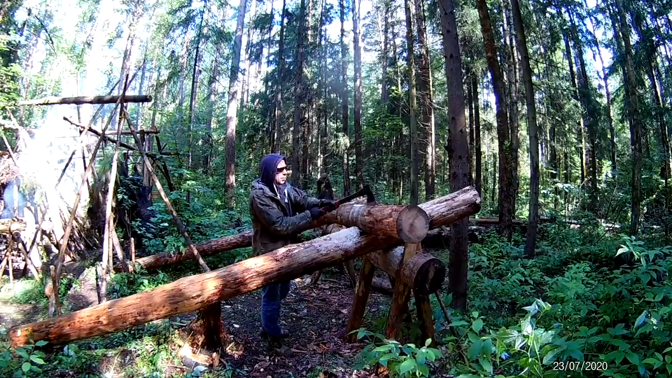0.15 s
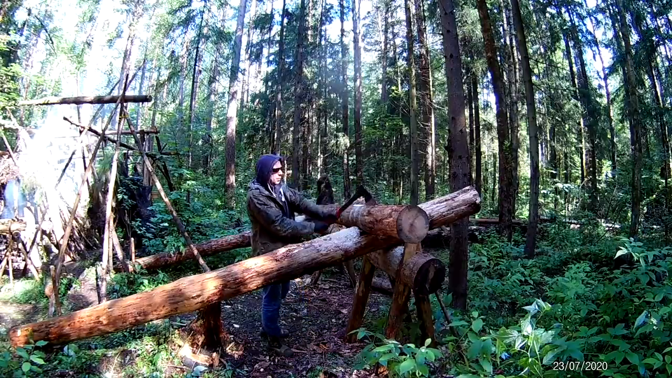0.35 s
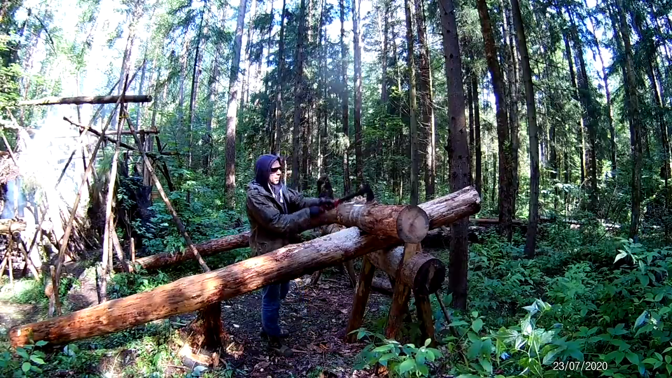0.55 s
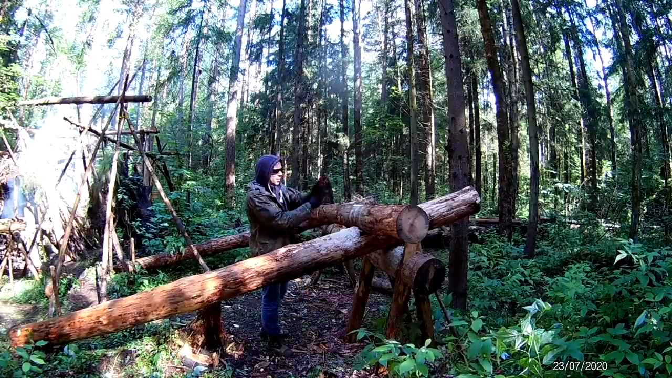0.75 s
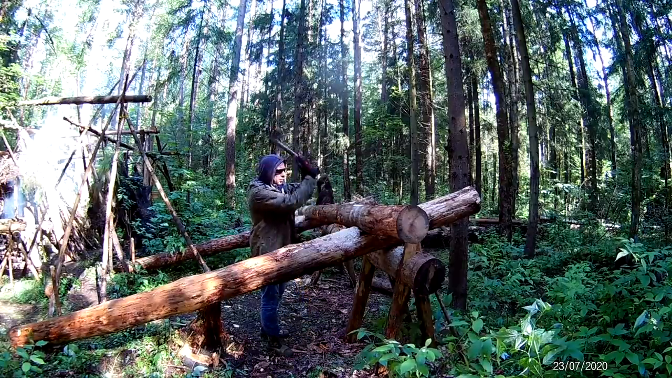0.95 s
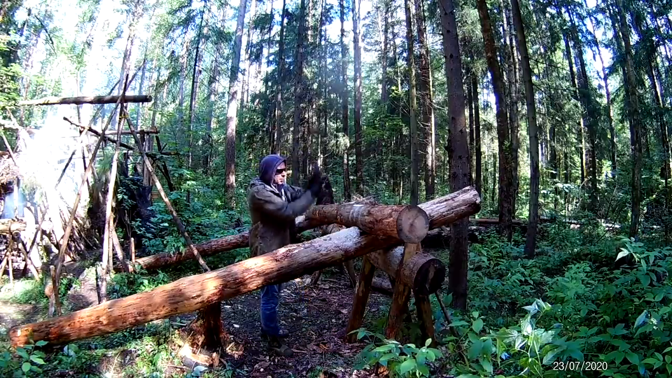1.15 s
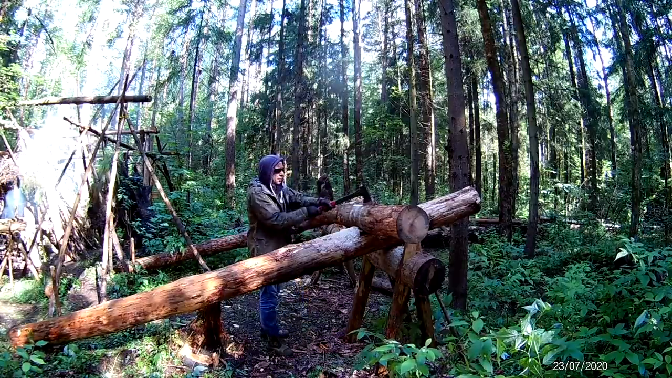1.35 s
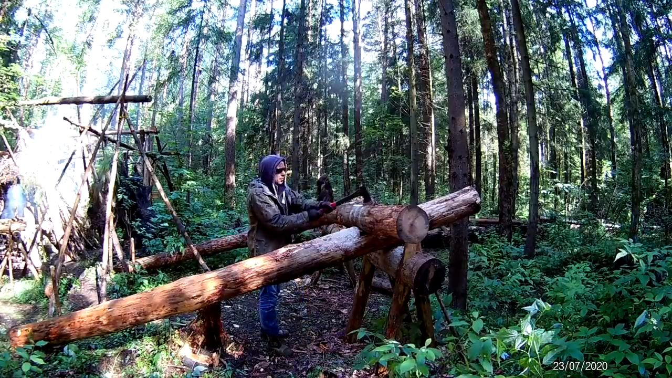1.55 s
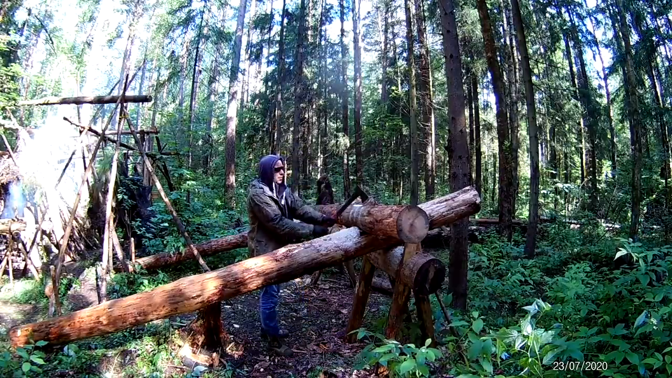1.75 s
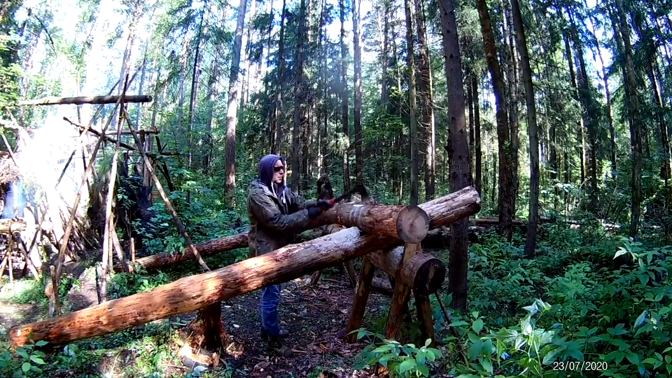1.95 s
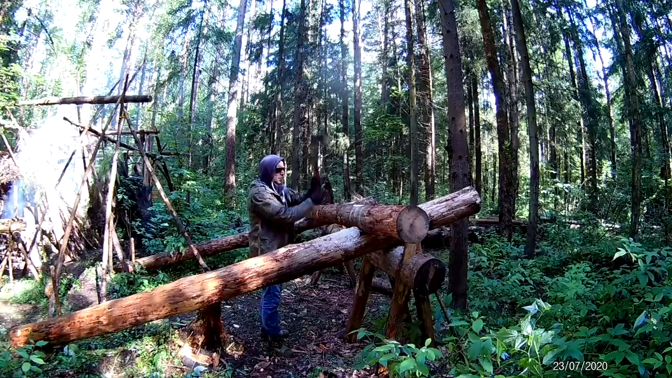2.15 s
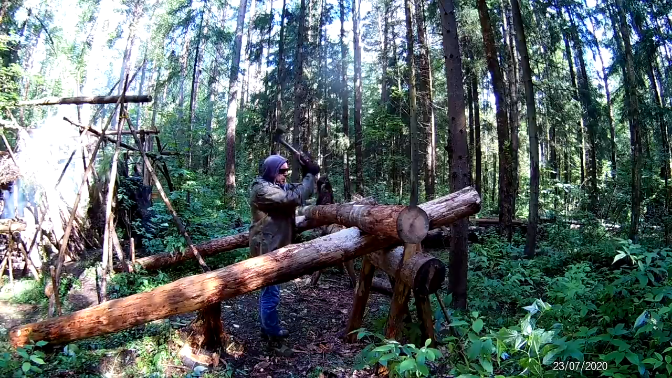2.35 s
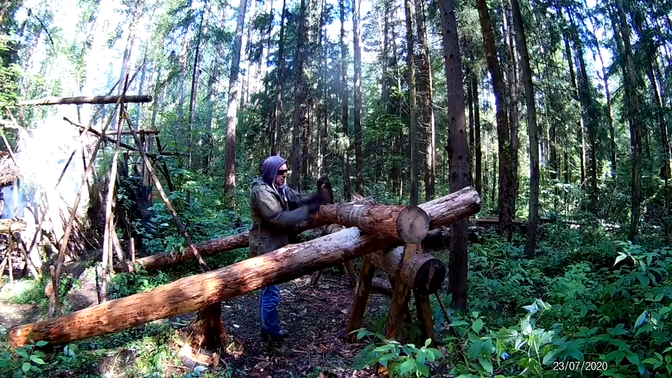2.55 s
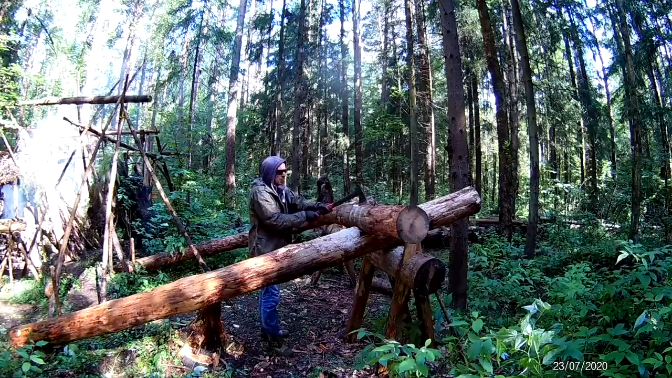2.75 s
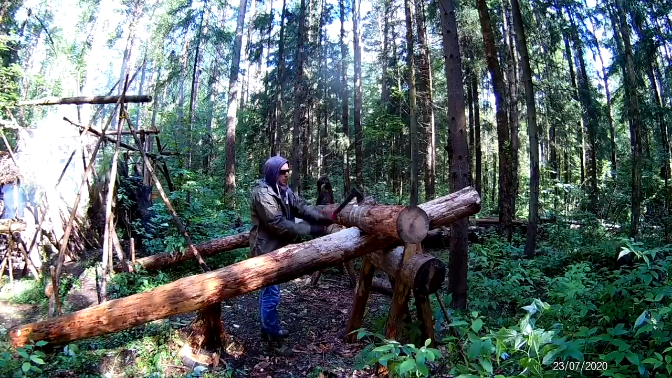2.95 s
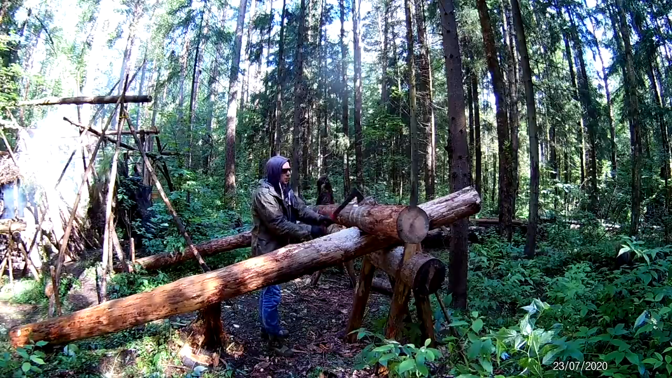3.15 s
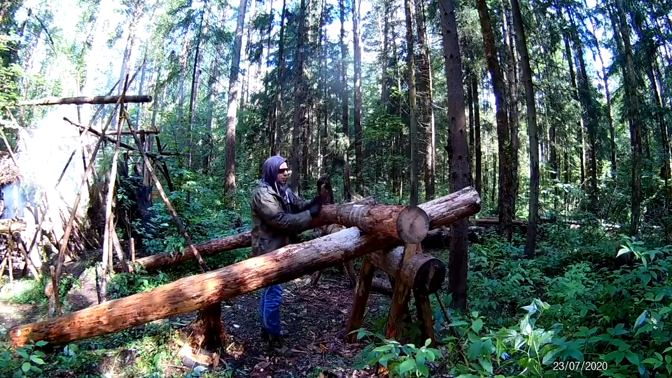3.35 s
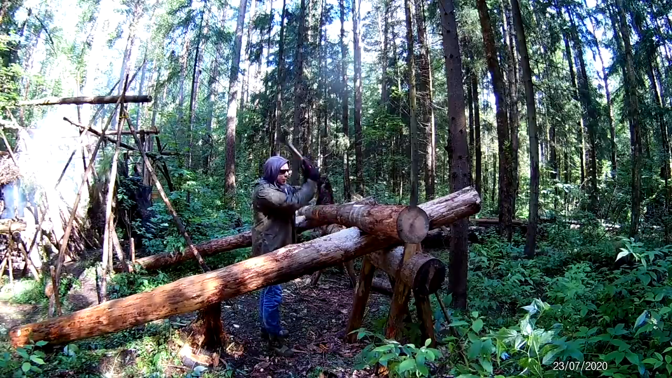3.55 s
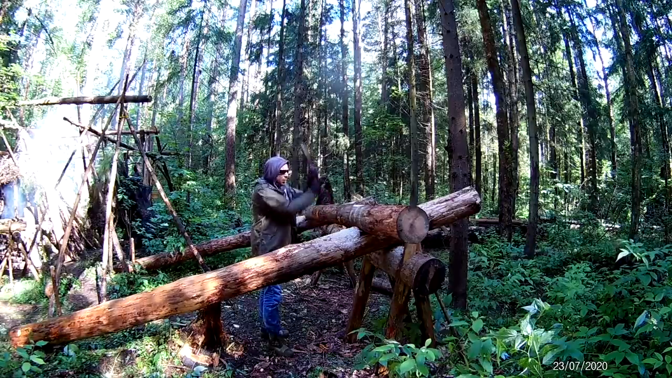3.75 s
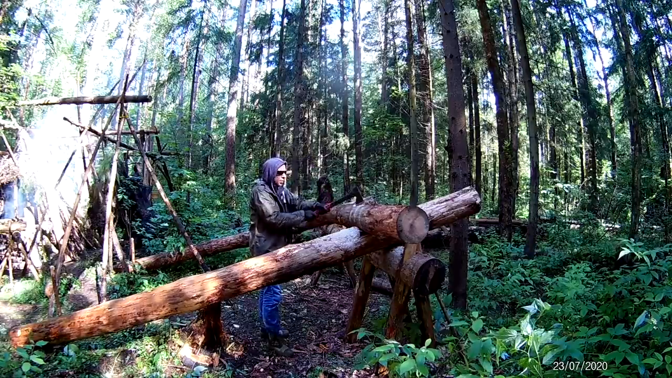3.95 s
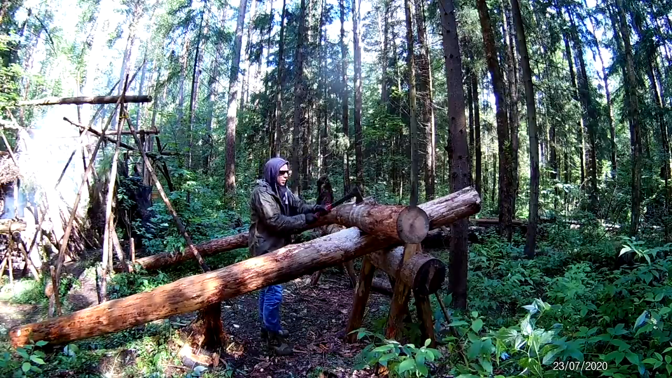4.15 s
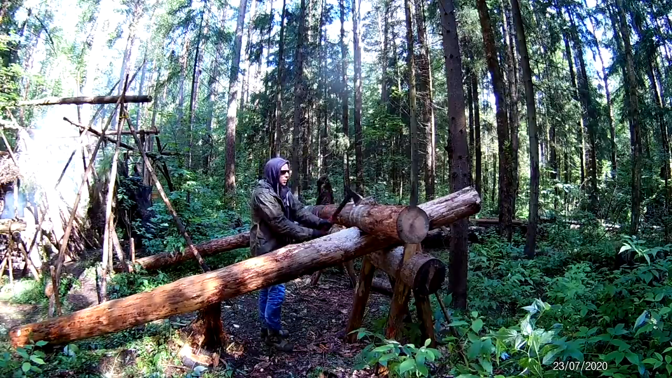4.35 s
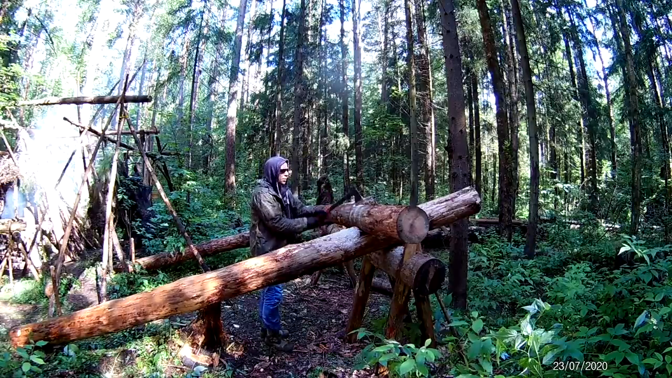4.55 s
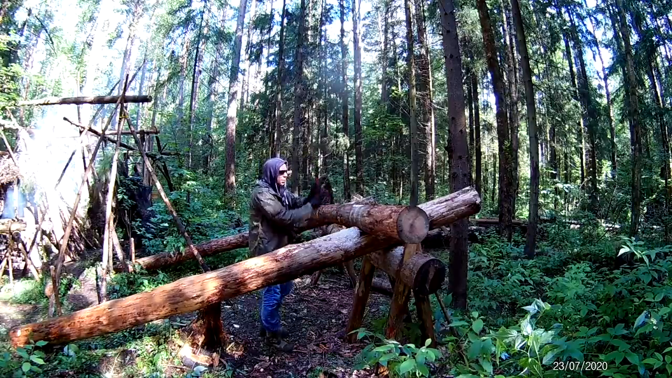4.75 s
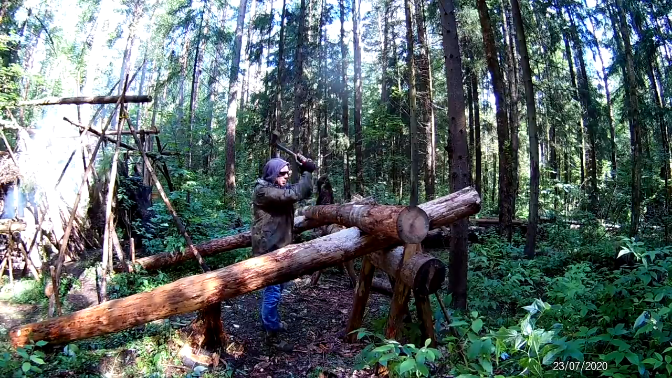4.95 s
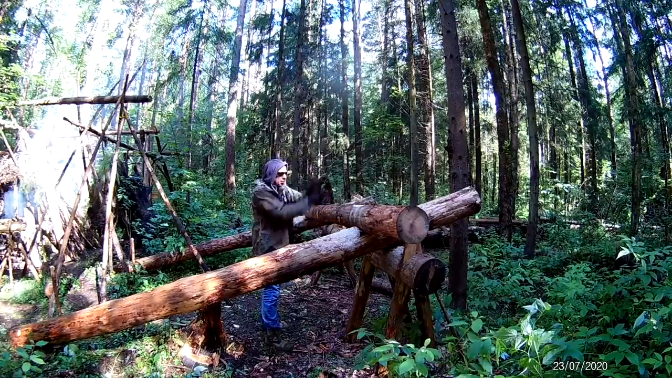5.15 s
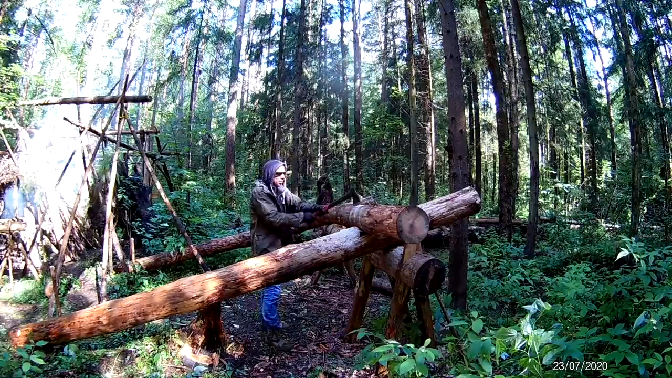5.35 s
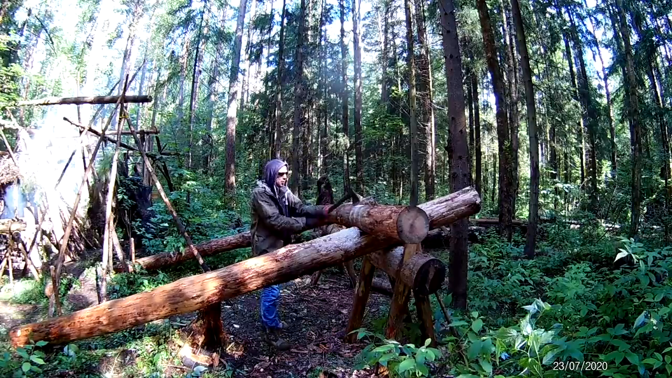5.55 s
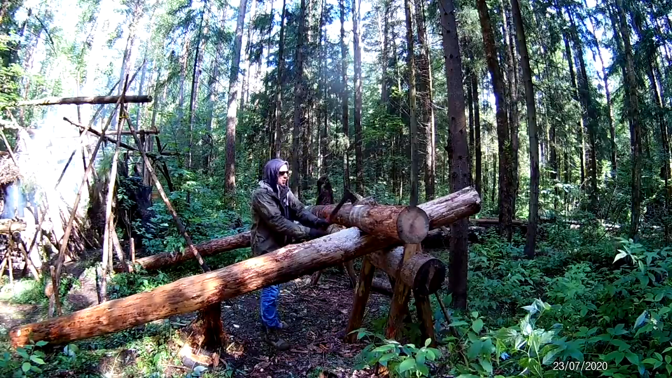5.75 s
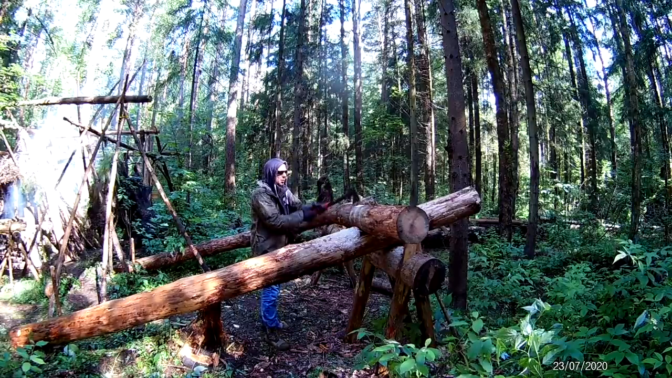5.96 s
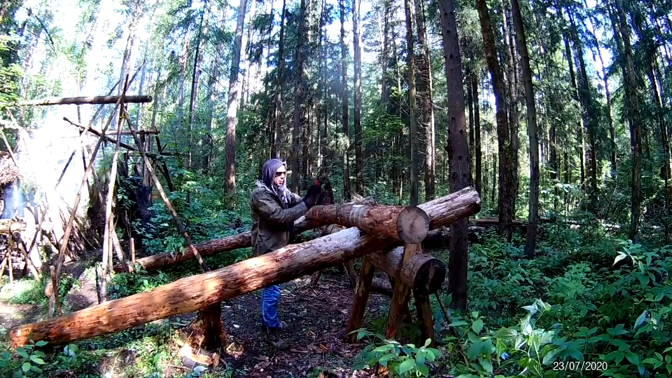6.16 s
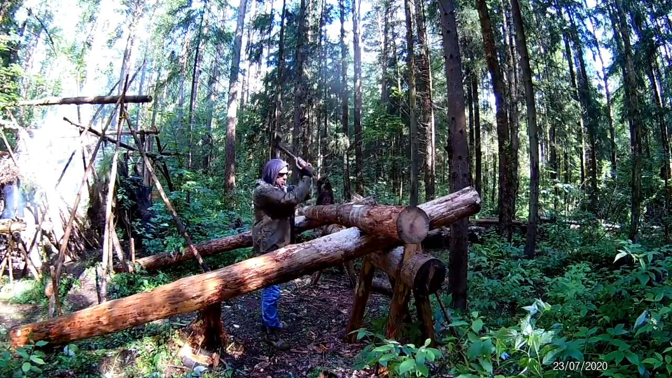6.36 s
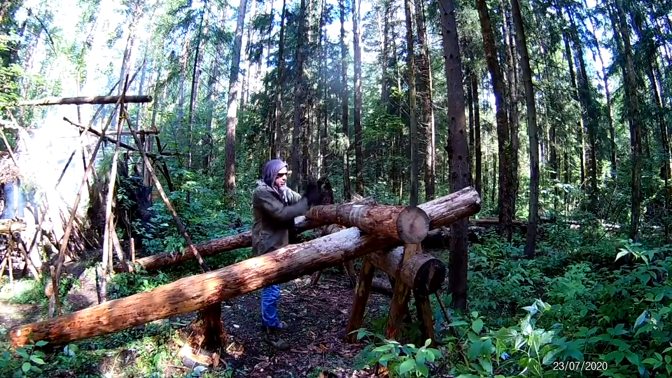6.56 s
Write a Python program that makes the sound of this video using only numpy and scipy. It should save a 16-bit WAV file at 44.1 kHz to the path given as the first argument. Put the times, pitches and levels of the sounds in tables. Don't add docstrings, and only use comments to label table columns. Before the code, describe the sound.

An axe chops a propped log with five sharp, woody knocks about 1.3 seconds apart in a still forest, while a small bird chips.

```python
import sys
import numpy as np
from scipy import signal
from scipy.io import wavfile
from scipy.ndimage import uniform_filter1d

SR = 44100
rng = np.random.default_rng(int(sys.argv[2]) if len(sys.argv) > 2 else 0)


def voltage_ratio(level):
    return 10 ** (np.asarray(level, float) / 20)


def persist_wave(psi):
    counts = np.round(np.clip(psi, -1, 1) * 32767).astype(np.int16)
    wavfile.write(sys.argv[1], SR, np.atleast_2d(counts).T)


N = 291501
LEAD = SR // 10
M = N + LEAD


def band(x, hz, width_hz, order=2):
    half = min(width_hz / hz / 2, .9)
    edges = [hz * (1 - half), hz * (1 + half)]
    return signal.sosfilt(signal.butter(order, edges, "band", fs=SR, output="sos"), x)


def unit(x):
    return x / np.sqrt(np.mean(x ** 2))


def fade(t, t60):
    return np.exp(-np.log(1000) * t / t60)


def add(out, s, x):
    i = int(round(s * SR)) + LEAD
    out[i:i + len(x)] += x[:len(out) - i]


def walk(rate):
    hold = int(SR / rate)
    levels = np.repeat(rng.standard_normal(M // hold + 1), hold)
    return 0.81 * uniform_filter1d(uniform_filter1d(levels, hold), hold)[:M]


# direction of the push (sign and size), length of the push in ms,
# pitch as a multiple of the knock pitch, time to fade by 60 dB in seconds, level in dB.
BLOW_STAGES = [
    (0.46, 0.56, 2.2, 0.03, -16.5),
    (-0.88, 1.04, 1.002, 0.018, -2),
    (1, 1.264, 1.596, 0.0097, -9.5),
    (-0.77, 1, 0.49, 0.019, -10),
    (-0.9, 1.23, 0.6666, 0.072, -11.5),
]
STAGE_DELAYS_MS = (0, 4.1, 12.2, 13.1, 13.5)


def knock(knocks, t, s, knock_hz, blow_db, split_db):
    tick_db = -2 + 0.58 * split_db
    knock_db = 2.5 + 0.11 * blow_db
    thump_db = 7 + blow_db
    stage_db = (tick_db, knock_db, thump_db, thump_db, thump_db)
    for ms, (sign, push_ms, ratio, t60, db), more_db in zip(STAGE_DELAYS_MS, BLOW_STAGES, stage_db):
        push = np.hanning(int(push_ms * SR / 1000) + 3)
        tone = np.sin(2 * np.pi * ratio * knock_hz * t) * fade(t, t60)
        body = sign * voltage_ratio(db + more_db) * tone
        add(knocks, s + ms / 1000, signal.fftconvolve(body, push / push.sum()))


# pitch in Hz, time
# to fade by 60 dB in seconds.
LOG_MODES = [(53, .4), (118.5, 0.4), (197.5, 0.28), (224, 0.034), (303, 0.073), (312.5, 0.53), (426, 0.29),
             (446, 0.5), (532, 0.19), (647, 0.2), (681, 0.08), (791, 0.47), (830, 0.15), (948, 0.37),
             (1010, .13), (1137, .29), (1231, 0.17), (1610, 0.077), (1619, 0.17), (1735, 0.092),
             (1821, 0.13), (1917, 0.092), (2291, 0.32)]
# level in dB where it swings most,
# place of the nearest still point (node) in metres.
MODE_SHAPES = [(-40.5, 1.2), (-23, -0.75), (-19.5, -0.59), (-8.5, -0.106), (-6, 0.19), (-20.5, -0.48),
               (-22.0, 0.314), (-18.5, -0.32), (-21, -0.39), (-20.5, -0.043), (-11, 0.33), (-38.5, -0.05),
               (-22, -0.282), (-38.5, 0.317), (-27, 0.227), (-33.5, -0.181), (-39.5, 0.243), (-25.5, 0.11),
               (-33.9, -0.24), (-34, -0.207), (-40, -0.208), (-44, 0.094), (-61, 0.21)]


def log_ring(t, blow_db, spot_m):
    wavers = [np.interp(t, np.linspace(0, .6, 24), row) for row in rng.standard_normal((len(LOG_MODES), 24))]
    ring = np.zeros(len(t))
    for k, ((db, node_m), (hz, t60)) in enumerate(zip(MODE_SHAPES, LOG_MODES)):
        bend_rad_m = 1.6 * np.sqrt(hz / 100)
        drive = voltage_ratio(db + blow_db) * (abs(np.sin(bend_rad_m * (spot_m - node_m))) + .05)
        rattle = voltage_ratio(2.0 * (hz / 400) ** 0.35 * wavers[k])
        ring += (-1) ** k * drive * rattle * np.sin(2 * np.pi * hz * t) * fade(t, t60)
    choke = np.exp(-(t / 0.18) ** 3)
    return ring * choke * np.clip(t / .009, 0, 1)


# delay in seconds, share of the bounce.
CRACK_RETURNS = [
    (.0120, 1.),
    (.0345, .5),
]


def fibres(t, bands, decays, bounce):
    snaps = voltage_ratio(3.0 * rng.exponential(size=len(t) // 40 + 1)).repeat(40)[:len(t)]
    noise = unit(snaps * rng.standard_normal(len(t)))
    torn = np.zeros(len(t))
    for (hz, width_hz), (db, t60) in zip(bands, decays):
        rise = np.clip(t * hz / 6.5, 0, 1) ** 2
        torn += voltage_ratio(db) * unit(band(noise, hz, width_hz, order=3)) * fade(t, t60) * rise
    back = 1 + bounce * sum(share * np.exp(-((t - lag) / 0.00059) ** 2) for lag, share in CRACK_RETURNS)
    return back * torn


# centre in Hz, width in Hz.
CRACK_BANDS = [(1050, 650), (1640, 400), (2220, 500), (2950, 700), (3700, 650), (4500, 900), (5950, 1400)]
TOP_BANDS = [(9250, 1500), (10900, 1500), (12500, 1300), (14200, 1400)]
# level in dB, time to fade by 60 dB in seconds.
CRACK_DECAYS = [(-23.5, 0.12), (-23, 0.073), (-36.5, .12), (-67.5, 0.2), (-43, 0.086), (-46.5, 0.068),
                (-59.5, 0.16)]
TOP_DECAYS = [(-60, 0.04), (-58, 0.01), (-65, 0.079), (-73.5, .045)]


def crack(out, t, s, blow_db, split_db):
    pivot_hz = 1497
    tear = []
    for (db, t60), (hz, _) in zip(CRACK_DECAYS, CRACK_BANDS):
        gain = max(np.log(hz / pivot_hz) / np.log(TOP_BANDS[0][0] / pivot_hz), 0)
        tear.append((db - 2 + .4 * blow_db + split_db * gain, t60))
    add(out, s, fibres(t, CRACK_BANDS, tear, 1.3))
    add(out, s + 0.0014, voltage_ratio(split_db) * fibres(t, TOP_BANDS, TOP_DECAYS, .1))


# start in seconds, knock pitch in Hz, strength in dB,
# how cleanly the wood splits in dB, spot struck along the log in metres.
AXE_BLOWS = [
    (-.0146, 503, -8, -4.5, -0.077),
    (1.351, 538.5, -1, 1.5, -.25),
    (2.6945, 461.6, 0.04, 8, -0.22),
    (3.998, 476, 0.3, 8, 0.23),
    (5.3598, 471, 0.36, 8, 0.33),
]


def axe():
    knocks, out = np.zeros(M), np.zeros(M)
    t = np.arange(SR * 3 // 5) / SR
    for s, knock_hz, blow_db, split_db, spot_m in AXE_BLOWS:
        knock(knocks, t, s, knock_hz, blow_db, split_db)
        add(out, s + .003, log_ring(t, blow_db, spot_m))
        crack(out, t, s, blow_db, split_db)
    return out + signal.sosfilt(signal.butter(2, 120, "high", fs=SR, output="sos"), knocks)


def steel():
    hz, level_db, t60_s, stop_s = 2125, -70, 7.6, 1.11
    t = np.arange(M) / SR
    damped = np.clip((stop_s + LEAD / SR - t) / 0.087, 0, 1)
    return voltage_ratio(level_db + 0.86 * walk(30)) * fade(t, t60_s) * damped * np.sin(2 * np.pi * hz * t)


# pitch band in Hz, near level in dB, near time to fade by 60 dB in seconds,
# far level in dB, far time to fade by 60 dB in seconds.
TRUNK_ECHO = [(93.5, -60, .2, -69, 1.6), (189, -34, 0.23, -76.5, 2.3), (350, -42.5, 0.23, -73, 1.9),
              (793, -31, 0.13, -61.5, 2.1), (1345, -48, 0.38, -53, 1.22), (3080, -48.5, 0.35, -59.5, 0.75),
              (5950, -48.5, 0.21, -53, 1.5), (11500, -48, .13, -60, .45)]
# seconds after the sound, spread in seconds, level in dB.
DENSE_STANDS = [
    (0.144, 0.0092, -0.5),
    (0.392, 0.038, 2.5),
]


def trunks(x):
    t = np.arange(2 * SR) / SR
    swell = voltage_ratio(sum(db * np.exp(-((t - s) / spread) ** 2) for s, spread, db in DENSE_STANDS))
    echo = np.zeros(len(t))
    for hz, near_db, near_t60, far_db, far_t60 in TRUNK_ECHO:
        decay = voltage_ratio(near_db) * fade(t, near_t60) + voltage_ratio(far_db) * fade(t, far_t60) * swell
        echo += band(rng.standard_normal(len(t)), hz, 0.66 * hz) * decay
    return signal.fftconvolve(x, echo * np.clip(t / 0.0053, 0, 1))[:len(x)]


# pitch in Hz, level in dB per Hz.
HUM_LEVELS = [(80, -94), (125, -101), (200, -92), (400, -94.5), (700, -96), (1000, -98), (1500, -106),
              (2200, -112), (3200, -116), (5000, -118), (8000, -124), (11000, -122), (14000, -120),
              (16500, -121)]


def hum():
    out, swell = np.zeros(M), walk(0.98)
    table_hz, table_db = np.transpose(HUM_LEVELS)
    for k in range(24):
        hz = 80 * 2 ** (k / 3)
        level_db = np.interp(np.log(hz), np.log(table_hz), table_db) + 10 * np.log10(hz * 0.31)
        depth = np.clip(1500 / hz, .2, 1)
        noise = unit(band(rng.standard_normal(M), hz, hz * .24))
        out += voltage_ratio(level_db + depth * (0.65 * swell + 1.5 * walk(5.9))) * noise
    return out


# pitch in Hz, width in Hz, boost in dB.
CASE_MODES = [(322.7, 19, 9), (438, 33, 7.5), (531, 12, 7), (695, 120, 2.5), (775, 150, 2.5),
              (1720, 190, 2.5)]


def case(x):
    return x + sum((voltage_ratio(db) - 1) * band(x, hz, width_hz, order=1) for hz, width_hz, db in CASE_MODES)


# time in seconds, level in dB.
WIND_GUSTS = [(0.0, -58), (0.33, -70), (0.61, -67), (1.32, -66), (2.47, -69.5), (2.87, -61), (3.26, -68),
              (3.41, -67.5), (3.85, -60.5), (4.14, -59.5), (4.38, -67.5), (5.21, -69.5), (5.47, -62),
              (5.8, -68), (6.09, -69.5), (6.61, -65.5)]


def wind():
    s, db = np.transpose(WIND_GUSTS)
    low = unit(band(rng.standard_normal(M), 43, 49))
    low = low + voltage_ratio(-13.5) * unit(band(rng.standard_normal(M), 84, 46))
    gusts_db = np.interp(np.arange(M) / SR, s + LEAD / SR, db)
    return voltage_ratio(gusts_db + 3.5 + 3.7 * walk(4.9)) * low


# start in seconds, peak level in dB, top pitch in Hz.
BIRD_CALLS = [(0.1161, -66, 5450), (0.6968, -67, 5450), (0.8435, -66, 5360), (0.9592, -63, 5480),
              (1.0768, -61.5, 5490), (1.1618, -62.5, 5500), (1.247, -62, 5440), (1.5913, -63.5, 5440),
              (1.9779, -64, 5450), (2.1625, -66, 5390), (2.25, -66, 5420), (2.346, -66, 5380),
              (2.4159, -65.5, 5520), (2.4972, -66, 5400), (3.9674, -65.5, 5580), (4.114, -66, 5500),
              (4.2395, -64, 5650), (4.6725, -65.5, 5560), (4.8385, -64, 5520), (4.9375, -61.5, 5650),
              (5.014, -63, 5550), (5.092, -62.5, 5520), (5.1677, -61.5, 5530), (5.235, -63, 5530),
              (5.3025, -63, 5450), (5.435, -65, 5670), (5.5, -63.5, 5660), (5.5693, -62.5, 5450),
              (6.4063, -64.5, 5450), (6.5465, -63.5, 5380)]


def bird():
    out, u = np.zeros(M), np.linspace(0, 1, int(.021 * SR))
    t = np.arange(SR // 20) / SR
    pauses = np.diff(np.transpose(BIRD_CALLS)[0], prepend=-1)
    noises = rng.standard_normal((len(BIRD_CALLS), len(t)))
    for (s, db, hz), pause, noise in zip(BIRD_CALLS, pauses, noises):
        fall = .8 if pause > .14 else .3
        shape = np.interp(u, [0, .13, .32, .55, .8, 1], [0.6, 0.6, 0.8, 0.55, fall * .6, 0])
        pitch = hz * np.interp(u, [0, .22, .42, .6, 1], [.82, .99, 1.035, .98, .77])
        note = voltage_ratio(db - 3.5) * shape * np.sin(2 * np.pi * np.cumsum(pitch) / SR)
        add(out, s - .0018, note)
        add(out, s + 0.018, voltage_ratio(-13.5) * note)
        add(out, s, voltage_ratio(-29.5) * signal.fftconvolve(note, noise * fade(t, 0.062)))
    return out


# start in seconds, peak level in dB, pitch in Hz.
CHIP_DROPS = [(0.493, -59, 2150), (0.5394, -63, 2110), (1.1029, -58, 1650), (2.9607, -61.5, 1580),
              (3.256, -56.5, 1930), (3.5613, -64, 1610), (3.6478, -57.5, 1800), (4.4973, -64.5, 1660),
              (4.708, -58, 1540), (6.2504, -73, 1667)]


def drops():
    out, t = np.zeros(M), np.arange(SR // 20) / SR
    for (s, db, hz), noise in zip(CHIP_DROPS, rng.standard_normal((len(CHIP_DROPS), len(t)))):
        add(out, s, voltage_ratio(db - 7) * unit(band(noise, hz, .8 * hz)) * fade(t, .045))
    return out


def scene():
    near = axe() + bird() + drops()
    around = case(trunks(near) + hum())
    return (near + around + steel() + wind())[None, LEAD:]


def roll_off(x):
    return signal.sosfilt(signal.butter(12, 15750, fs=SR, output="sos"), x)


def record(dry):
    limited = np.tanh(.5 * dry) / .5
    return roll_off(limited)


dry = scene()
out = record(dry)
persist_wave(out)
```